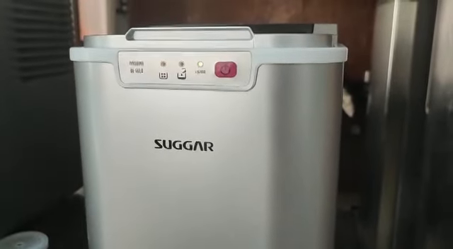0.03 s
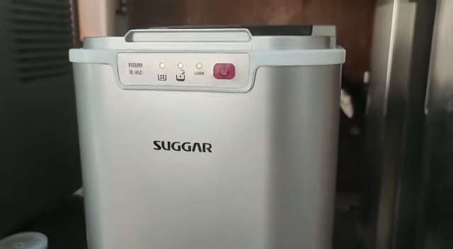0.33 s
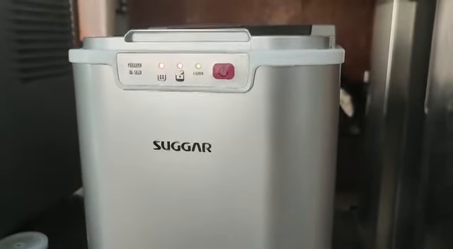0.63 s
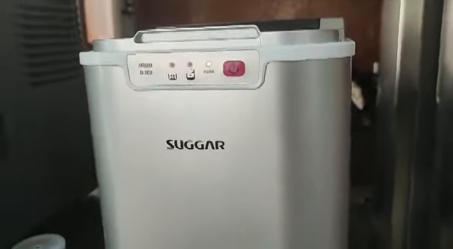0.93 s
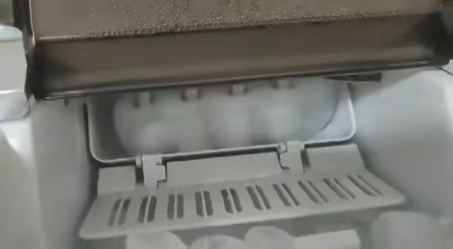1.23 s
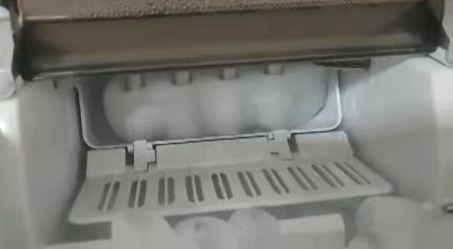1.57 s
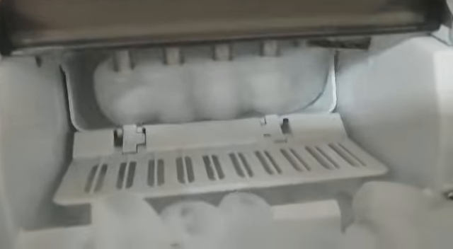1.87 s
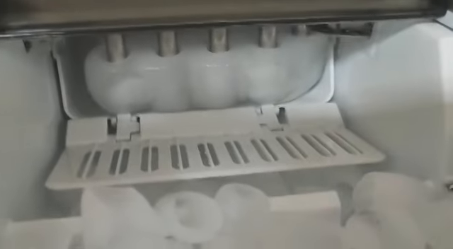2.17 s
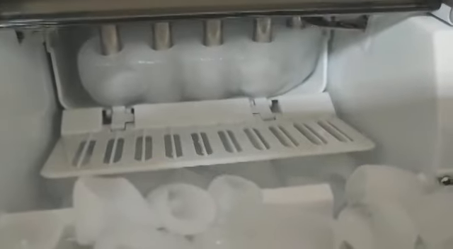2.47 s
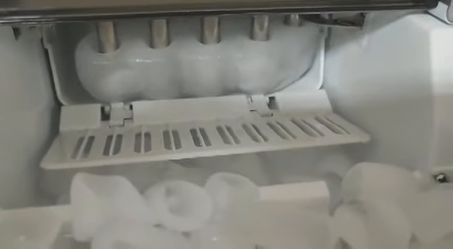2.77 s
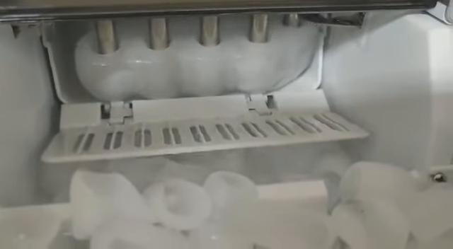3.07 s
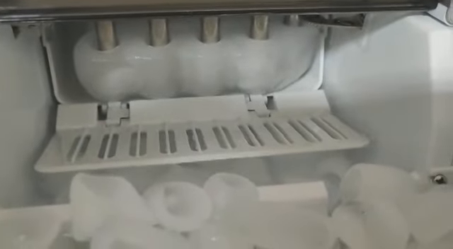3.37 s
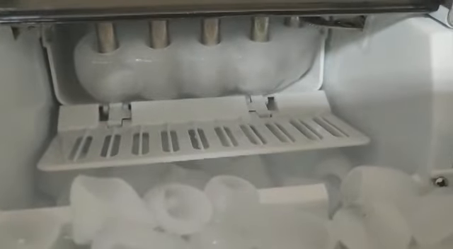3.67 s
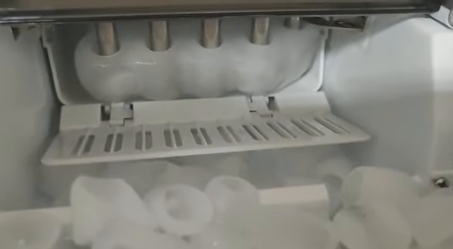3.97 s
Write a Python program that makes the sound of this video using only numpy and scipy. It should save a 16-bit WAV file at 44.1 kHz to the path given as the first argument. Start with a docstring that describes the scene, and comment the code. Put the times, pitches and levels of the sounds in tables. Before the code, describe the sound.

A countertop ice maker hums faintly with its compressor and fan, cutting out briefly at 1.1 seconds. Then, close under the lid, a geared motor whirs and ticks rapidly to the end, over light ice cracks and knocks. Louder juddering scrapes and clatter on the plastic tray come around 2, 2.9, 3.3 and 3.9 seconds, with a short high squeak near 3.25. Everything rings slightly in the small cabinet.

```python
"""A countertop ice maker in a kitchen. From the front, only its compressor and fan hum.
After a short silence we listen under the open lid: a geared motor ticks once a turn as it tips the
plastic water tray. Ice cracks, knocks and judders along the tray in four scrapes, and squeaks as it
jams. The ticks, knocks and scrapes ring in the small plastic cabinet."""
import sys
import numpy as np
from scipy import signal
from scipy.fft import rfft, irfft, next_fast_len
from scipy.io import wavfile
from scipy.ndimage import uniform_filter1d, map_coordinates

SR = 44100
rng = np.random.default_rng(int(sys.argv[2]) if len(sys.argv) > 2 else 0)


def pcm_store(signal):
    """Save signal as 16-bit PCM."""
    levels = np.round(np.clip(np.atleast_2d(signal), -1, 1) * 32767)
    wavfile.write(sys.argv[1], SR, levels.astype(np.int16).T)


N = 176400
T = np.arange(N) / SR
SIZE = next_fast_len(N + 16384, True)
FREQS = np.maximum(np.arange(SIZE // 2 + 1) * SR / SIZE, 1)


def amp(db):
    """Turn decibels into a gain."""
    return 10 ** (np.asarray(db) / 20)


def unit(x):
    """Scale a sound to an average (rms) level of 1."""
    return x / np.sqrt(np.mean(x ** 2))


def noise():
    """Plain white hiss."""
    return rng.standard_normal(N)


def through(x, response):
    """Pass a sound through a filter."""
    return irfft(rfft(x, SIZE) * response, SIZE)[..., :N]


def gains(points):
    """Join (freq_hz, level_db) points into a filter."""
    hz, db = np.array(points, float).T
    return amp(np.interp(np.log(FREQS), np.log(hz), db))


def causal(gain):
    """Make a filter ring only after a blow, never before it."""
    cepstrum = irfft(np.log(gain + 1e-7), SIZE)
    cepstrum[1:SIZE // 2] *= 2
    cepstrum[SIZE // 2 + 1:] = 0
    return np.exp(rfft(cepstrum))


def resonance(hz, width_hz):
    """A filter that rings at one pitch; the narrower, the longer."""
    return 1 / (1 + 1j * (FREQS - hz ** 2 / FREQS) / width_hz)


def above(hz, order):
    """A filter that keeps what lies above a pitch."""
    return 1 / np.sqrt(1 + (hz / FREQS) ** (2 * order))


def pulses(times, sizes):
    """One click at each time."""
    keep = (times >= 0) & (times < T[-1])
    return np.bincount((times[keep] * SR).astype(int), sizes[keep], N)


def echo(x, fade_s):
    """A blur of reflections that falls 60 dB in fade_s."""
    tail = noise() * amp(-60 * T / fade_s)
    return through(x, rfft(tail / np.linalg.norm(tail), SIZE))


def stereo(mid, side, width):
    """Both ears share mid; side is added on the left and taken away on the right."""
    return mid + np.array([[1], [-1]]) * through(side, gains(width))


def wander(per_s):
    """A smooth random wobble of size about 1."""
    k = int(SR / per_s)
    steps = np.repeat(rng.standard_normal(N // k + 1), k)
    return unit(uniform_filter1d(uniform_filter1d(steps, k), k)[:N])


def tone(hz, db, drift_s=0):
    """A pure note; drift_s nudges it early or late."""
    return np.sqrt(2) * amp(db) * np.sin(2 * np.pi * (hz * (T + drift_s) + rng.random()))


def blows(rows, push, rattle, decay_s, size=4096):
    """Each row (peak_s, peak_db, filter) is a push and a dying rattle that set the filter ringing; the ring is
    loudest at peak_s."""
    out = np.zeros(N + size)
    for (start, db, response), grit in zip(rows, rng.standard_normal((len(rows), size))):
        ring = irfft(response, SIZE)[:size]
        force = rattle * grit * np.exp(-T[:size] / decay_s)
        force[0] += push
        hit = signal.fftconvolve(force, ring)[:size]
        i = int(start * SR) - np.argmax(np.abs(ring))
        out[i:i + size] += amp(db) * hit / np.abs(hit).max()
    return out[:N]


COMPRESSOR_HZ = 59.23
# The notes in the hum: multiple of the compressor's pitch
HUM_MULTIPLES = [1, 2, 4, 26, 27, 28, 65, 82, 110, 174]
# How loud each of those notes is: level_db
HUM_LEVELS = [-68.5, -73, -76.5, -78.5, -86, -82, -92, -95, -96, -92]
# How loud the sizzle's overtones are: pitch_hz, level_db
SIZZLE_COLOUR = [(1000, -107), (3000, -104), (5100, -97.5), (7700, -114), (10500, -108)]


def compressor():
    """The compressor hums, and its many high overtones blend into a faint sizzle."""
    drift_s = 2e-5 * wander(4.4)
    hum = sum(tone(k * COMPRESSOR_HZ, db, drift_s) * amp(0.7 * wander(5.7))
              for k, db in zip(HUM_MULTIPLES, HUM_LEVELS))
    high = np.arange(17, 260)
    overtones = np.zeros(2049, complex)
    overtones[high] = amp(0.5 * rng.standard_normal(len(high)))
    overtones[high] *= np.exp(2j * np.pi * rng.random(len(high)))
    cycle = irfft(overtones) * len(overtones) * np.sqrt(2)  # one wave, played over and over
    position = (T + drift_s) * COMPRESSOR_HZ % 1 * (len(cycle) - 1)
    sizzle = map_coordinates(cycle, [position], order=1)
    return hum + through(sizzle, gains(SIZZLE_COLOUR))


# The fan's rush of air from the front: freq_hz, relative_db
FAN_COLOUR = [(15, -51), (25, -23), (49, -1.5), (111, -14.5), (141, -8), (236, -5), (503, -16), (620, -13),
              (1130, -22), (1560, -26), (1790, -26.5), (3000, -35.5), (5000, -35.5), (7000, -37.5),
              (7920, -47), (10400, -42), (16000, -42.5)]
# How much that rush differs between the ears: freq_hz, side_db
FAN_WIDTH = [(60, -4), (200, -13), (600, -3.5), (2000, 4), (16000, 1)]


def fan():
    """The fan's blades make a low, wavering note over the rush of air."""
    blades = tone(hz=107.6, db=-71, drift_s=0.0028 * wander(5.9)) * amp(0.75 * wander(4.1))
    mid, side = (unit(through(noise(), gains(FAN_COLOUR))) * amp(-61 + 2.5 * wander(8.12))
                 for _ in range(2))
    return stereo(mid, side, FAN_WIDTH) + blades


# The fan's rush of air under the lid: freq_hz, relative_db
BIN_AIR_COLOUR = [(25, -2.5), (60, -52), (85, 2), (130, 0), (300, -0.5), (600, -20), (1500, -14.5),
                  (3000, -19), (3600, -24.5), (5000, -23.5), (6500, -28), (7700, -38), (10500, -36),
                  (16000, -38.5)]


def bin_air():
    """The fan's air rushes almost steadily in the open bin."""
    return unit(through(noise(), gains(BIN_AIR_COLOUR))) * amp(-55.5 + 0.43 * wander(6.4))


# The notes at which tray and cabinet ring: pitch_hz, width_hz, relative_db
CABINET_NOTES = [(241, 54.3, 0), (318, 47.5, 3), (423, 53.9, -2.5), (511, 19, -18), (559, 92, -2),
                 (709.4, 194, -0.5), (833.6, 198, -5), (1050.5, 128, -7.5), (1459, 31, -13),
                 (1608, 79, -14), (1993, 121, -17.5), (2405, 234, -21), (3180, 280, -25.5),
                 (4480, 230, -26), (5750, 530, -37)]


def cabinet_ring():
    """The plastic tray and cabinet as a filter: many short rings and no deep bass."""
    rings = sum((-1) ** k * amp(db) * resonance(hz, width)
                for k, (hz, width, db) in enumerate(CABINET_NOTES))
    return rings * causal(above(186, order=4))


# The motor's rasp over time: time_s, level_db, pitch_hz
MOTOR_RASP = [(1.161, -82, 2800), (1.299, -78, 2930), (1.899, -69.5, 2970), (2.1, -60.5, 3018),
              (2.499, -62, 3100), (2.649, -73, 3180), (3.481, -94, 2934), (3.53, -62, 2910),
              (3.59, -63.5, 3110), (3.649, -96, 2870), (4, -80, 2800)]


def motor_rasp(clock, width_hz=150, buzz_hz=120):
    """A narrow hiss that pulses at twice the mains rate and rises a little with the load."""
    times, db, hz = np.array(MOTOR_RASP).T
    real, imag = through(np.array([noise(), noise()]), 1 / (1 + (FREQS / width_hz) ** 4))
    phase = 2 * np.pi * np.cumsum(np.interp(T, times, hz)) / SR
    hiss = np.real((real + 1j * imag) * np.exp(1j * phase))  # a rumble moved up to the pitch
    buzz = 1 + .5 * np.cos(2 * np.pi * buzz_hz * clock)
    return unit(hiss * buzz) * amp(np.interp(T, times, db))


TURNS_PER_S, TEETH = 20, 10
FIRST_TICK_S, JAM_S, JAM_LAG_S = 1.168, 3.1, 0.016


def gear_ticks(cabinet, clock, run_up_s=0.24):
    """The gears tick once a turn, growing louder as they take up the load."""
    turns = FIRST_TICK_S + np.arange(3 * TURNS_PER_S) / TURNS_PER_S
    turns += JAM_LAG_S * (turns > JAM_S)
    clicks = pulses(turns, amp(rng.standard_normal(len(turns))))
    from_tick_s = ((clock * TURNS_PER_S + .5) % 1 - .5) / TURNS_PER_S
    rattle = .075 * noise() * np.exp(-np.abs(from_tick_s) / .003)
    gearbox = cabinet * (1 + amp(0.5) * resonance(hz=567, width_hz=50))
    run_up = np.clip((T - FIRST_TICK_S) / run_up_s, 0, 1)
    return amp(-52.7) * unit(through(clicks + rattle, gearbox)) * run_up


def gear_chatter(cabinet, clock, eased_by_s=2.63):
    """Every gear tooth gives a tiny burst: a steady whirr, and a brighter chatter that eases off."""
    since_tooth_s = clock % (1 / (TURNS_PER_S * TEETH))
    teeth = noise() * np.exp(-since_tooth_s / 0.003)
    whirr = unit(through(teeth, cabinet))
    chatter = unit(through(teeth, resonance(hz=1900, width_hz=2960) ** 2 * cabinet))
    chatter_db = -77 + 15.5 * np.clip((eased_by_s - T) / 0.19, 0, 1)
    return amp(-53.5) * whirr + amp(chatter_db) * chatter


def motor(cabinet):
    """The geared motor turns evenly and falls behind once, when the ice jams."""
    clock = T - FIRST_TICK_S - JAM_LAG_S * (T > JAM_S)
    return gear_ticks(cabinet, clock) + gear_chatter(cabinet, clock) + motor_rasp(clock)


# Sharp cracks in the ice: peak_s, relative_db
ICE_CRACKS = [(1.267, -49), (1.332, -53), (1.365, -47.5), (1.392, -45), (1.518, -48), (1.588, -48.5),
              (1.992, -36), (2.072, -44.5), (2.142, -44), (2.242, -56), (2.468, -45), (2.83, -46),
              (2.861, -45.5), (2.92, -31.5), (3.02, -46), (3.258, -33.5), (3.302, -34.5), (3.348, -37.5),
              (3.853, -42), (3.936, -55)]
# The bright sound of a crack: freq_hz, relative_db
CRACK_COLOUR = [(500, -45), (1800, 10.5), (3300, 0), (4900, 9), (6200, 1), (7600, -9), (11000, -6),
                (16000, -13.5)]


def ice_cracks():
    """Brittle ice cracks in short, bright bursts."""
    brittle = causal(gains(CRACK_COLOUR))
    cracks = [(start, db, brittle) for start, db in ICE_CRACKS]
    return amp(5.5) * blows(cracks, push=0, rattle=1, decay_s=0.0064)


# Ice knocking on the tray: peak_s, relative_db, pitch_hz, width_hz
ICE_KNOCKS = [(1.334, -35, 1120, 600), (1.375, -34, 330, 300), (1.505, -36.5, 400, 500),
              (1.545, -38, 326, 302), (1.795, -38.5, 280, 250), (1.584, -32, 1740, 600),
              (1.589, -20, 850, 414), (1.998, -20, 710, 450), (2.039, -27.5, 700, 900),
              (2.059, -28, 1090, 1210), (2.069, -25.5, 952, 700), (2.098, -31, 1060, 300),
              (2.145, -24, 734, 200), (2.149, -31, 1600, 200), (2.48, -35, 299, 403.3),
              (2.678, -29.5, 887, 690), (2.7, -27.5, 867, 596), (2.792, -34, 807, 1800),
              (2.873, -29.5, 380, 302), (2.902, -22.5, 1080, 2000), (2.922, -17, 1130, 980),
              (2.937, -23.5, 1630, 500), (2.947, -25, 324, 305), (2.956, -23.5, 950, 600),
              (2.967, -19, 725, 400), (2.985, -19, 640, 250), (3.022, -27, 1560, 1800),
              (3.243, -17.5, 950, 900), (3.285, -19.5, 1000, 199), (3.326, -17.5, 378, 149),
              (3.387, -15.5, 1030, 1100), (3.405, -21, 420, 400), (3.469, -29.5, 800, 1205),
              (3.842, -27.5, 710, 700), (3.852, -24, 740, 790), (3.891, -23, 455, 500),
              (3.92, -24.5, 840, 600), (3.944, -21.5, 730, 890)]


def ice_knocks(cabinet):
    """Ice knocks on the tray, and each spot wakes its own range of the cabinet's notes."""
    knocks = [(start, db, cabinet * resonance(hz, width)) for start, db, hz, width in ICE_KNOCKS]
    return amp(-2.5) * blows(knocks, push=1, rattle=.07, decay_s=0.0064)


# Four scrapes, each a list of relative levels: time_s, judder_db, grind_db, crunch_db
ICE_SCRAPES = [
    [(1.955, -82, -83, -80), (1.975, -36.5, -52, -52), (2.0, -41, -40.5, -76), (2.025, -44, -50, -63),
     (2.062, -47, -44, -55), (2.16, -45, -48, -86), (2.2, -89, -55, -80)],
    [(2.76, -46.5, -57, -57), (2.85, -59, -49.5, -73), (2.895, -43.5, -52, -46.5), (2.915, -32, -35.5, -44),
     (2.984, -38, -38.5, -46.5), (2.998, -38.5, -46, -64), (3.09, -52.5, -54, -68)],
    [(3.14, -89, -58, -78), (3.234, -50, -37.5, -54), (3.242, -37.5, -36.5, -36.5),
     (3.325, -30, -37.5, -50.5), (3.395, -34, -43, -46.5), (3.415, -35, -46, -54),
     (3.54, -57.5, -44.5, -68)],
    [(3.82, -48, -66, -68), (3.86, -35, -46.5, -57), (3.906, -31, -38.5, -46), (3.94, -36.5, -40, -45),
     (3.956, -48, -45, -74), (4.0, -42, -59, -72)],
]
# The sound of crunching grains: freq_hz, relative_db
CRUNCH_COLOUR = [(900, -6), (2000, 5), (3000, -9), (4500, -1.5), (5700, -3.5), (7500, -18.5),
                 (11000, -14.5), (16000, -24)]


def ice_scrapes(cabinet, slips_per_s=169.4, grains_per_s=1400):
    """Ice sticks and slips on the tray, shaking the cabinet, while small grains crunch off."""
    gap, strength = rng.standard_normal((2000, 2)).T
    slip_times = np.cumsum(np.exp(.45 * gap) / slips_per_s)
    rubbing = pulses(slip_times, amp(-strength)) + 0.036 * noise()
    upper = above(525, order=4)  # splits the low judder from the higher grinding
    judder = through(rubbing, cabinet * causal(np.sqrt(1 - upper ** 2)))
    grind = through(rubbing, cabinet * causal(upper * above(866, order=1)))
    grains = (rng.random(N) < grains_per_s / SR) * np.sign(noise()) * amp(5.5 * noise())
    crunch = through(grains, causal(gains(CRUNCH_COLOUR)))
    # even out each layer, so that the table shapes its loudness
    layers = [x / np.sqrt(uniform_filter1d(x ** 2, size=2205)) for x in (judder, grind, crunch)]
    trims_db = (-2.5, -4.5, -1.5)
    out = 0
    for scrape in ICE_SCRAPES:
        times, *levels = np.array(scrape).T
        sliding = (T >= times[0]) & (T <= times[-1])
        for layer, db, trim_db in zip(layers, levels, trims_db):
            out = out + layer * amp(np.interp(T, times, db) + trim_db) * sliding
    return out


# The notes in the squeak: pitch_hz, width_hz, relative_db
SQUEAK_NOTES = [(2440, 180, -11), (2670, 94, 6), (2960, 130, 11.5), (3330, 130, 4), (3730, 110, 10),
                (4340, 110, -20)]
# How loud the squeak is over time: time_s, level_db
SQUEAK_LEVELS = [(3.11, -82), (3.12, -53.5), (3.135, -84), (3.175, -57.5), (3.2, -49.5), (3.27, -48),
                 (3.31, -50), (3.35, -79)]


def ice_squeak():
    """Wet ice rubs on the tray and squeaks on a few high notes."""
    rings = sum(amp(db) * resonance(hz, width) for hz, width, db in SQUEAK_NOTES)
    times, db = np.array(SQUEAK_LEVELS).T
    return unit(through(noise(), rings)) * np.interp(T, times, amp(db), left=0, right=0)


def ice_whistle(peak_s=3.27, swell_s=0.028):
    """The ice whistles briefly at the height of the jam."""
    swell = np.exp(-((T - peak_s) / swell_s) ** 2)
    return tone(hz=4470, db=-43.5, drift_s=4e-5 * wander(150)) * swell


# How much the sound in the bin differs between the ears: freq_hz, side_db
BIN_WIDTH = [(60, -12), (300, -17), (550, -17.5), (1000, 1), (2000, 1), (16000, -1)]
# How far it leans to the left: freq_hz, left_over_right_db
BIN_BALANCE = [(60, 2.5), (300, 2.5), (600, 3.5), (1200, 0), (2500, 2.5), (4500, -1.5), (7500, 3.5),
               (11500, 2), (16000, 9)]


def open_bin():
    """Motor and ice echo in the bin, over the compressor's hum and the fan's air."""
    cabinet = cabinet_ring()
    near = motor(cabinet) + ice_knocks(cabinet) + ice_cracks() + ice_scrapes(cabinet)
    near += ice_squeak() + ice_whistle()
    near += amp(-10) * echo(near, fade_s=0.063)
    # the bass reaches the left side first
    left_lead = through(near, 1j * np.pi * FREQS * 86e-6 / (1 + (FREQS / 930) ** 4))
    mid = near + bin_air() + tone(COMPRESSOR_HZ, db=-60.5)
    side = echo(near, fade_s=0.066) + bin_air() + left_lead
    lean = np.sqrt(gains(BIN_BALANCE))
    return through(stereo(mid, side, BIN_WIDTH), np.array([lean, 1 / lean]))


def scene(front_ends_s=1.114, bin_starts_s=1.1587):
    """The closed machine, a moment of silence, then the open bin fading in."""
    fade_out = np.clip((front_ends_s - T) / 0.0051, 0, 1)
    fade_in = np.clip((T - bin_starts_s) / 0.3, 0, 1) ** 0.4
    return (compressor() + fan()) * fade_out + open_bin() * fade_in


def record(dry, top_hz=15900):
    """The very highest treble is cut off steeply."""
    return signal.sosfilt(signal.ellip(10, .2, 70, top_hz, fs=SR, output="sos"), dry)


dry = scene()
out = record(dry)
pcm_store(out)
```